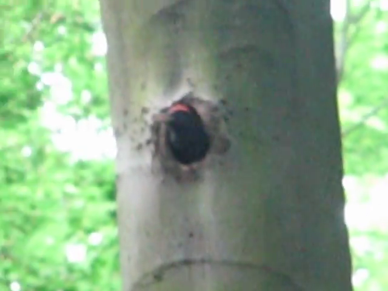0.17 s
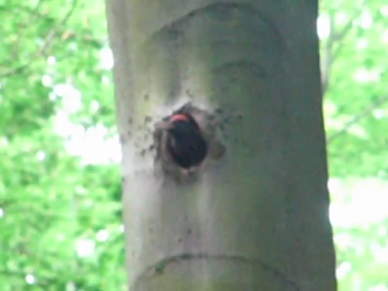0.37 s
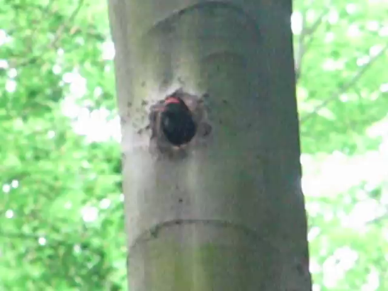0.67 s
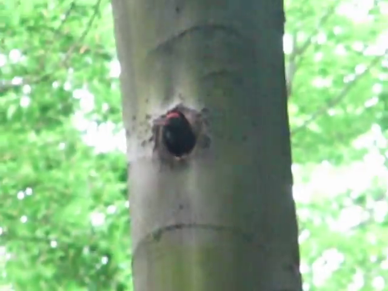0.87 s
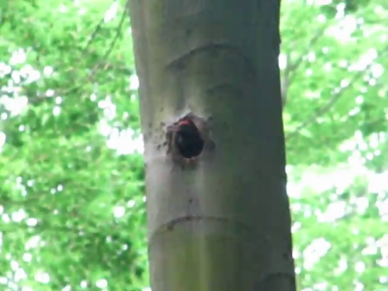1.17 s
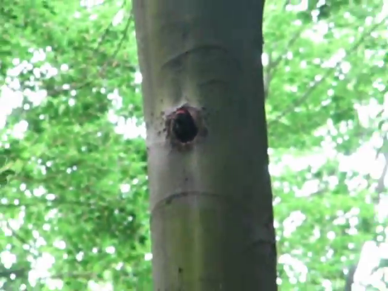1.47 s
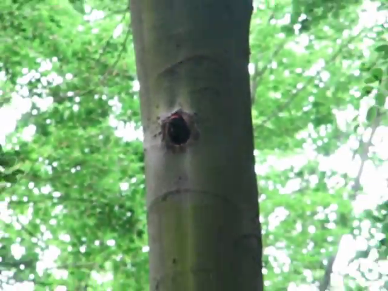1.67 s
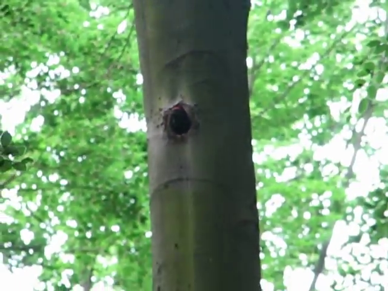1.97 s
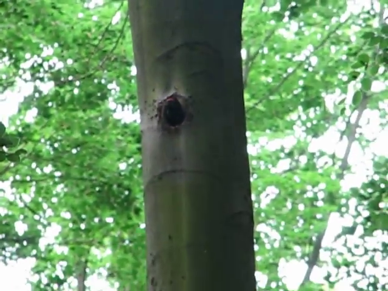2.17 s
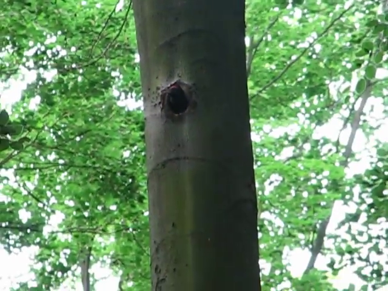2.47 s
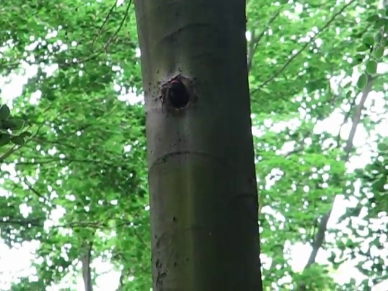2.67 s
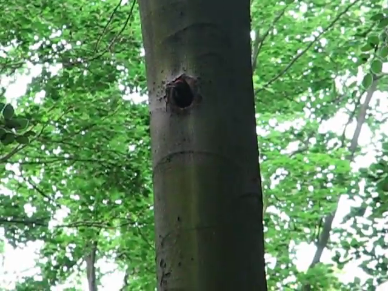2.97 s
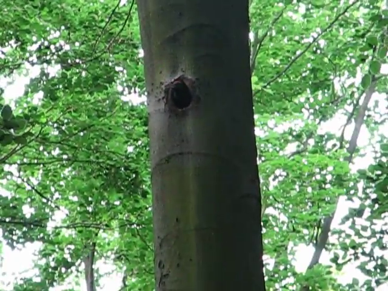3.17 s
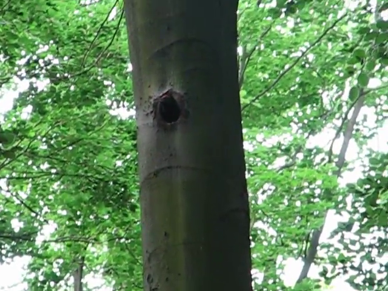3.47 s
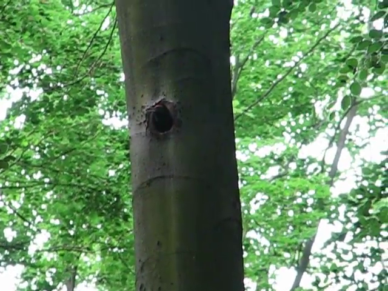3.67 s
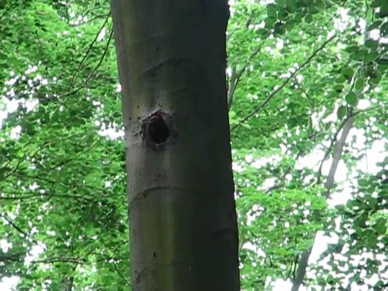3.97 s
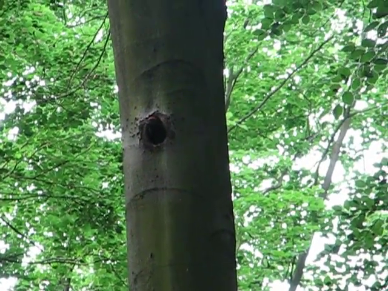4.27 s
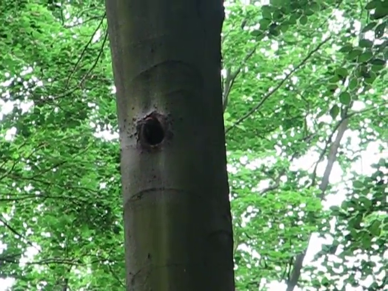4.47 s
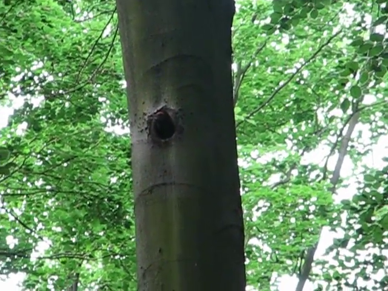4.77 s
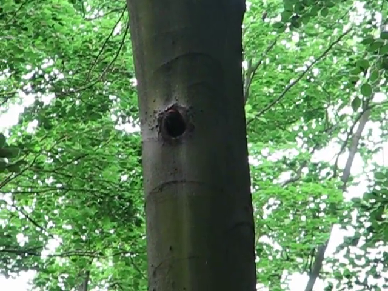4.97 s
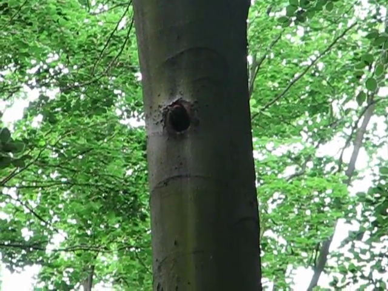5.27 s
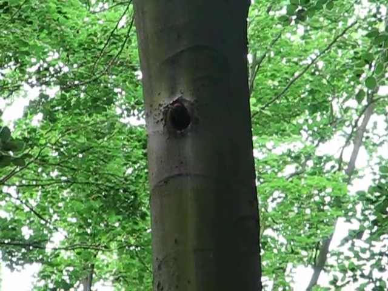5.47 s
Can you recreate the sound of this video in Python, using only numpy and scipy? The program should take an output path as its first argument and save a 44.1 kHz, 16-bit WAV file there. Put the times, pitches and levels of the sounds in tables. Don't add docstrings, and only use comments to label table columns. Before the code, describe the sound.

A woodland heard through a handheld stereo camera, about 5.6 seconds long. Soft broad leaf hiss, a thin steady motor whine near 8 kHz and a faint low rumble that swells now and then lie underneath. Nestlings rasp in dry, quickening buzzes, faint at 0.0, 0.3 and 0.55, stronger at 0.8, 1.1 and 1.35, then near 2.0, 2.2, 2.8, 3.0, 3.7, 4.0 and 4.7, with small beak clicks between. At 1.4 a parent's whistle whoops up and holds around 1.5 kHz until 2.1, dropping off at the end; a short squeal overlaps its start. Fingers knock dully on the camera throughout, sharpest at 1.6. Distant birds whistle thinly, and a sinking trill runs from 2.35 to 3.6 as the blurred chorus is fullest. A nearer high whistle sounds at 4.8, alongside two hoarse, sharp double barks at 4.8-4.9 and 5.1-5.2, echoing among trunks before fading into leaf hiss.

```python
import sys
import numpy as np
from scipy import signal
from scipy.fft import rfft, irfft
from scipy.io import wavfile
from scipy.ndimage import uniform_filter1d

SR = 44100
rng = np.random.default_rng(int(sys.argv[2]) if len(sys.argv) > 2 else 0)


def makeup_ratio(level_db):
    decades = np.asarray(level_db, float) / 20
    return 10 ** decades


def transcribe(signal):
    frames = np.atleast_2d(signal).T
    limited = np.clip(frames, -1, 1)
    pcm = np.round(limited * 32767).astype(np.int16)
    wavfile.write(sys.argv[1], SR, pcm)


N = 247401
TIME = np.arange(N) / SR

# time in seconds, effort in dB, overtones in dB per octave,
# share of the beak turned away from the camera (0-1).
LONG_EFFORT = [
    (1.394, 0, 0, .1),
    (1.45, 1.5, 0, .35),
    (1.54, -.5, 0, .1),
    (1.63, -3, 0, .05),
    (1.69, 4.5, -1.5, .05),
    (1.77, 2.5, -.5, .05),
    (1.86, -2.5, .3, .1),
    (2.05, 0.2, 2.8, .72),
    (2.092, -5, -6, .35),
]
LONG_TOP_S = 1.423


def noise(count):
    return rng.standard_normal(N if count == N else 2 ** 15)[:count]


def colour(table, hz):
    f, v = np.transpose(table)
    return np.interp(np.log(np.maximum(hz, 1)), np.log(f), v)


def shape(x, gain):
    count = x.shape[-1]
    hz = np.arange(count // 2 + 1) * SR / count
    return irfft(rfft(x) * gain(hz), count)


def unit(x):
    return x / np.sqrt(np.mean(x ** 2))


def walk(rate, count=N):
    k = max(int(SR / rate), 1)
    return unit(uniform_filter1d(uniform_filter1d(noise(count), k), k))


def bell(hz, width):
    return lambda f: 1 / (1 + 1j * (f - hz ** 2 / np.maximum(f, 1)) / width)


def rows(table, fade=0.0038):
    s, *columns = np.transpose(table)
    s = np.sort(s)
    part = slice(max(int(s[0] * SR), 0), min(int(s[-1] * SR), N))
    t = TIME[part]
    gate = np.clip(np.minimum(t - s[0], s[-1] - t) / fade, 0, 1)
    return part, [np.interp(t, s, c) for c in columns], gate


def pan(x, db):
    return x * makeup_ratio(np.array([[db / 2], [-db / 2]]))


def leaves_and_air():
    # frequency in Hz, level in dB per Hz.
    air_colour = [(15, -36), (25, -12), (76, .5), (273, -11), (321, -9), (706, -4), (1930, -9.5),
                  (3700, -2.5), (5720, -8), (7510, -8), (8150, -8), (8350, -18), (15200, -22), (16500, -45)]
    mid, side = rng.standard_normal((2, N))
    side = shape(side, lambda f: np.clip(.12 + f / 2000, 0, 1))

    def gain(f):
        spread = np.clip(0.19 + f / 2500, 0, 1)
        return makeup_ratio(colour(air_colour, f)) / np.sqrt(1 + spread ** 2)

    return makeup_ratio(-51.0) * unit(shape(np.array([mid + side, mid - side]), gain))


def low_rumble():
    # peak in seconds, level in dB, spread in seconds.
    swells = [
        (.25, -65, .35),
        (1.45, -59.5, .24),
        (2.42, -62, .22),
        (3.35, -66, .2),
        (3.72, -57.5, .24),
        (4.45, -70, .12),
    ]
    level = makeup_ratio(-67) + sum(makeup_ratio(db) * np.exp(-((TIME - s) / spread) ** 2) for s, db, spread in swells)
    low = rng.standard_normal(N) + 0.36 * rng.standard_normal((2, N))
    low = unit(shape(low, lambda f: bell(340, 260)(f) ** 2))
    return pan(low, 1.9) * level * makeup_ratio(2.35 * walk(13.7))


def bird_blur():
    # time in seconds, level in dB.
    chorus_curve = [
        (0, -66),
        (.5, -62),
        (1.2, -62),
        (2.2, -54),
        (2.9, -50),
        (3.6, -50),
        (4.1, -53),
        (4.6, -58),
        (5.61, -55),
    ]
    bands = [(2994, 750, 1.5), (3700, 570, -1.5), (4400, 790, 2)]  # (Hz, width Hz, dB)
    chorus = 0
    for hz, width, db in bands:
        band = unit(shape(rng.standard_normal((2, N)), lambda f: bell(hz, width)(f) ** 2))
        chorus = chorus + makeup_ratio(db - 4.0 + 2.55 * walk(12.6)) * band
    return chorus * makeup_ratio(np.interp(TIME, *np.transpose(chorus_curve)))


def motor_whine():
    hiss = rng.standard_normal(N) + 0.96 * rng.standard_normal((2, N))
    return makeup_ratio(-63) * unit(shape(hiss, bell(8010, 60)))


def handling():
    # start in seconds, peak in dB, ring in Hz, snap in dB, left minus right in dB.
    knocks = [(0.971, -40.5, 480, -18, -5), (1.125, -43.5, 720, -13, -6), (1.601, -27.5, 800, 8, 2),
              (1.608, -32, 577, -17, -9), (1.849, -49, 791, -8, 1.5), (2.229, -41, 547, -11, -4),
              (2.334, -40.5, 557, -18, -7), (2.719, -42, 1040, -14, -1), (2.749, -43, 1100, -8, -1),
              (3.553, -38, 293, -19, 2.0), (3.63, -44, 385, -10, 4), (3.798, -42, 318, -15, 6),
              (4.299, -49, 1030, -13, -3), (4.428, -37, 330, -12, 3), (4.787, -47, 721, -7, 0.5),
              (5.014, -40, 570, -11, -7), (5.053, -45, 720, -8, -3)]
    out, t = np.zeros((2, N)), np.arange(1300) / SR
    for s, db, hz, snap_db, side_db in knocks:
        ring = np.sin(2 * np.pi * hz * t) * np.exp(-t / .004) * np.minimum(t * hz * 1.2, 1)
        ring += .7 * np.sin(2 * np.pi * 1.57 * hz * t) * np.exp(-t / 0.0024)
        ring += .6 * np.sin(2 * np.pi * 1350 * t) * np.exp(-t / .0007)
        snap = makeup_ratio(snap_db) * np.sin(2 * np.pi * 2400 * t) * np.exp(-t / 0.00085)
        start = int(s * SR)
        out[:, start:start + len(t)] += pan(makeup_ratio(db) * (ring + snap), side_db)
    tick_s, left_db, right_db, lag = .03627, -6.5, -1.5, .7
    k = np.arange(N) - (tick_s - 1e-4) * SR
    tick = makeup_ratio(np.array([[left_db], [right_db]])) * np.sinc(0.76 * (k - np.array([[0], [lag]])))
    return out - tick


def trill_notes():
    notes = []
    for k in range(17):
        stressed = k % 2
        hz = 3480 - k * (26 + 12 * (1 - stressed))
        db = -48.5 + .45 * k * (stressed - .5)
        notes.append((2.347 + k * .0746, .027, hz * 1.1, hz * .9, 15, db, -3.0))
    return notes


def songbirds():
    # start in seconds, length in seconds, pitch in Hz, level in dB.
    high_bird = [
        (.38, .12, 4480, -53),
        (.5, .25, 4400, -57),
        (1.66, .22, 4380, -55),
        (2.57, .25, 4365, -53.5),
        (3.14, .093, 4370, -61),
        (3.42, .21, 4340, -53.5),
        (4.805, .18, 4420, -44.5),
    ]
    low_bird = [
        (.54, .12, 3760, -50),
        (.66, .22, 3760, -54),
        (.85, .14, 3800, -61),
        (1.25, .04, 3590, -55),
        (4.1, .3, 3680, -63),
        (4.75, .04, 3560, -54),
    ]
    stray_bird = [
        (0, .39, 5380, -60),
        (2.7, .07, 1100, -55),
    ]
    # blur in Hz (the last a share of pitch), left minus right in dB.
    bird_voices = [
        (45, .5),
        (130, -3.5),
        (.07, -.5),
    ]
    # start in seconds, length in seconds, start in Hz, end in Hz, level in dB.
    slides = [
        (3.24, .05, 5600, 6600, -59),
        (4.45, .1, 8000, 8500, -64),
        (4.55, .04, 6500, 3600, -60),
        (4.59, .04, 3600, 4400, -60),
    ]
    notes = []
    for bird, (blur, side_db) in zip((high_bird, low_bird, stray_bird), bird_voices):
        for s, length, hz, db in bird:
            blur_hz = blur if blur > 1 else blur * hz
            notes.append((s, length, hz, hz * (1 - .008), blur_hz, db, side_db))
    notes += [(s, length, hz0, hz1, 30, db, -.5) for s, length, hz0, hz1, db in slides]
    out = np.zeros((2, N))
    for s, length, hz0, hz1, blur_hz, db, side_db in notes + trill_notes():
        part, (hz,), gate = rows([(s, hz0), (s + length, hz1)], fade=.012)
        tone = np.sin(2 * np.pi * np.cumsum(hz + blur_hz * walk(450, len(hz))) / SR)
        out[:, part] += pan(gate * makeup_ratio(db + 2.1 * walk(40, len(hz))) * tone, side_db)
    return out


def trunks(x):
    # frequency in Hz, time to die by 60 dB in seconds.
    echo_t60 = [(500, 1.6), (1500, 1.9), (3200, 1.1), (4500, 1.15), (6500, .9), (10000, .3), (15000, 0.18)]
    gap_s, rise_s, early_s, early_db = .008, .02, .06, 6.0
    t = np.arange(int(1.6 * SR)) / SR
    tail = 0
    for hz in 400 * 2 ** np.arange(0, 5.4, .5):
        band = shape(rng.standard_normal((3, len(t))),
                     lambda f: np.exp(-(np.log2(f / hz + 1e-9) * 2.4) ** 2))
        tail = tail + (band[:2] + .6 * band[2]) * makeup_ratio(-60 * t / colour(echo_t60, hz))
    tail = tail * (1 + makeup_ratio(early_db) * np.exp(-t / early_s))
    tail = tail * (1 - np.exp(-np.maximum(t - gap_s, 0) / rise_s)) / np.sqrt(SR / 5)
    return signal.fftconvolve(np.atleast_2d(x), tail, axes=1)[:, :N]


def near_trunks(near):
    # delay in seconds, level in dB, left minus right in dB.
    slaps = [
        (.04, -12, 2),
        (.022, -17, -3),
        (.071, -19, 0),
    ]
    soft = uniform_filter1d(near, size=3)
    return sum(pan(makeup_ratio(db) * np.roll(soft, int(lag * SR)), side_db) for lag, db, side_db in slaps)


def microphone_ports(near):
    # frequency in Hz, left minus right in dB.
    port_tilt = [(1000, -1), (3300, -6.5), (4500, 2.5), (6500, -2), (11000, -2.5)]
    return np.array([shape(near, lambda f: makeup_ratio(side * colour(port_tilt, f) / 2) * np.exp(.22j * side))
                     for side in (1, -1)])


def rasps():
    # peak in seconds, peak in dB, swell in seconds per 20 dB, pulses per second at the peak,
    # break in seconds per 20 dB.
    begging = [(.03, -50, .08, 500, .03), (.265, -53, .1, 480, .04), (.55, -47, .1, 520, .04),
               (.798, -40, .08, 600, .015), (1.102, -37, .09, 700, .02), (1.345, -32, .06, 850, .04),
               (1.99, -44, .08, 600, .04), (2.218, -41, .06, 560, .06), (2.783, -43, .08, 590, .03),
               (3.024, -40, .06, 585, .02), (3.722, -39, .1, 635, .012), (3.992, -38, .09, 600, .02),
               (4.375, -54, .08, 550, .04), (4.663, -40, .09, 600, .02)]
    # resonance in Hz, width in Hz, level in dB.
    rasp_throat = [(2700, 800, -11), (3900, 1500, -7), (6550, 600, 5), (7500, 904, -3), (5800, 6000, -10)]
    # start in seconds, level in dB.
    beak_clicks = [
        (.495, -33),
        (.725, -38),
        (1.008, -33),
        (3.633, -31),
        (4.575, -34),
        (4.788, -28),
        (5.053, -30),
    ]
    pulses = np.zeros(N)
    for s, peak_db, swell, top_rate, stop in begging:
        part = slice(max(int((s - .2) * SR), 0), int((s + .1) * SR))
        t = TIME[part] - s
        effort_db = np.where(t < 0, 20 * t / swell, -20 * t / stop)
        rate = top_rate * makeup_ratio(.16 * effort_db) * (1 + .05 * walk(500, len(t)))
        beats = np.diff(np.floor(np.cumsum(rate) / SR), prepend=0)
        breathy = .03 * noise(len(t))
        uneven = beats * makeup_ratio(2.5 * noise(len(t)))
        pulses[part] += makeup_ratio(peak_db + effort_db) * (uneven + breathy) * np.sqrt(SR / top_rate)
    for s, db in beak_clicks:
        pulses[int(s * SR) + np.array([0, 60, 150])] += makeup_ratio(db) * np.array([1, .7, .5])

    def response(f):
        ring = sum(makeup_ratio(db) * bell(hz, width)(f) for hz, width, db in rasp_throat)
        dulled = ring / (1 + 1j * f / 11000) ** 2 / (1 + 1j * f / 8000)
        return dulled / (1 - 1j * 1500 / (f + 1))

    return makeup_ratio(7.5) * shape(pulses, response)


def cry(table, throat, hoarse_db=-10.5):
    part, (hz, db, half_db, jitter, third_db), gate = rows(table)
    turn = 2 * np.pi * np.cumsum(hz * (1 + 1.6 * jitter * walk(1500, len(hz)))) / SR
    voice = 0
    for k in range(1, 17):
        line_db = colour(throat, k * hz / 2) + half_db * (k % 2) + third_db * (k == 6)
        voice = voice + makeup_ratio(line_db) * np.sin(k * turn / 2 + k * k)
    puffs = (1 + np.sin(turn)) * noise(len(hz))
    hoarse = makeup_ratio(hoarse_db) * unit(shape(puffs, lambda f: makeup_ratio(.72 * colour(throat, f))))
    out = np.zeros(N)
    out[part] = gate * makeup_ratio(db + 1.5 * walk(250, len(hz))) * (unit(voice) + hoarse)
    return out


def second_bird():
    # time in seconds, pitch in Hz, level in dB.
    squeal_curve = [
        (1.419, 1930, -37),
        (1.443, 1900, -29),
        (1.48, 1870, -30.5),
        (1.525, 1780, -42),
    ]
    # frequency in Hz, level in dB.
    squeal_throat = [(1500, -11), (3700, -2), (5700, -4), (7600, 3), (9500, -11), (11400, -11),
                     (15000, -32)]
    half_db, jitter = -25, .023
    return cry([(*row, half_db, jitter, 0) for row in squeal_curve], squeal_throat)


def bark(s, hoarse, clean, snap_hz, db, half_db, air_db):
    # frequency in Hz, level in dB.
    bark_throat = [(500, -50), (1000, -30), (1600, -18), (2300, -15), (3200, 0), (4400, -7), (6400, -3),
                   (8200, -13), (9500, -25), (15000, -42)]
    rough, calm = .032, .008
    low_hz, top_hz, sag_hz, end_hz = 1050, 1640, 1460, 1250
    edge_db, hoarse_db, sag_db = -19, -3.5, -4
    snap = s + hoarse
    held_hz = snap_hz + .3 * (sag_hz - snap_hz)
    steps = [(s, low_hz, edge_db, rough),
             (s + .4 * hoarse, top_hz, hoarse_db, rough),
             (snap - .003, top_hz, hoarse_db, rough),
             (snap, snap_hz, 0, calm),
             (snap + .55 * clean, held_hz, 0, calm),
             (snap + clean, sag_hz, sag_db, calm),
             (snap + clean + .008, end_hz, edge_db, rough)]
    third_db = -4 + 11 * np.exp(-((3 * snap_hz - 4400) / 300) ** 2)
    curve = [(t, hz, db + rel_db, half_db, jitter, third_db) for t, hz, rel_db, jitter in steps]
    return cry(curve, bark_throat, air_db)


def double_barks():
    # start in seconds, hoarse part in seconds, clean part in seconds, pitch at the snap in Hz,
    # level in dB.
    bark_events = [
        (4.824, .03, .014, 1470, -24.5),
        (4.892, .021, .013, 1670, -21.5),
        (5.082, .031, .017, 1660, -22.3),
        (5.163, .021, .008, 1640, -22),
    ]
    half_db, air_db = (-13, -20), (-6.5, -10.5)
    return sum(bark(*row, half_db[k % 2], air_db[k % 2]) for k, row in enumerate(bark_events))


def long_pitch(t):
    start_hz, top_hz, hold_hz = 1465, 1930, 1561
    start, end = LONG_EFFORT[0][0], LONG_EFFORT[-1][0]
    rise = np.interp(t, [start, LONG_TOP_S], [start_hz, top_hz])
    settle = hold_hz + (top_hz - hold_hz) * np.exp(-np.maximum(t - LONG_TOP_S, 0) / .012)
    return np.where(t < LONG_TOP_S, rise, settle) - 660 * np.exp((t - end) / .023)


def long_call():
    # harmonic number, level in dB, fades per second,
    # one fade in seconds, reflection share (0-1).
    overtones = [(1, -40.3, 9.5, 1.655, .25), (2, -39.3, 13.0, 1.724, .5), (3, -43, 19, 1.748, .5),
                 (4, -49, 17, 1.7, .4), (5, -46, 15, 1.75, .5), (6, -52, 11, 1.8, .4),
                 (7, -65, 14, 1.7, .4)]
    part, (effort_db, tilt_db, _), gate = rows(LONG_EFFORT)
    t = TIME[part]
    since = np.maximum(t - LONG_TOP_S, 0)
    effort_db = effort_db + 12 * np.exp(-since / .014) * (t >= LONG_TOP_S)
    shut = np.exp(-(since / .055) ** 2)
    tilt_db = tilt_db - 13 * shut
    turn = 2 * np.pi * np.cumsum(long_pitch(t) * (1 + .001 * walk(60, len(t)))) / SR
    out = np.zeros((2, N))
    for k, db, rate, fade_s, share in overtones:
        k, share = round(k), share * (1 - shut)
        paths = np.abs(1 - share * np.exp(2j * np.pi * rate * (t - fade_s))) / np.sqrt(1 + share ** 2)
        side_db = -2.5 / 2 + 2.2 * walk(9.4, len(t))
        level_db = db + effort_db + tilt_db * np.log2(k) + 1.5 * walk(45, len(t))
        level = np.sqrt(2) * gate * paths * makeup_ratio(level_db + np.array([side_db, -side_db]))
        out[:, part] += level * np.sin(k * turn + np.array([[0], [-.15 * k]]))
    return out


def scene():
    background = leaves_and_air() + low_rumble() + bird_blur() + motor_whine()
    far, call = songbirds(), long_call()
    rasp, squeal, barks = rasps(), second_bird(), double_barks()
    near = barks + makeup_ratio(-3.5) * squeal + rasp
    away = np.interp(TIME, *np.transpose(LONG_EFFORT)[[0, -1]])
    straight_call = call * makeup_ratio(-11 * away)
    echo_db = -6 + 11 * away
    wet_call = shape(makeup_ratio(echo_db + 1.2) * call.mean(0), lambda f: 1 / (1 - 1j * 1900 / (f + 1)))
    echo = makeup_ratio(-4.5) * barks + makeup_ratio(-1.2) * squeal + makeup_ratio(.3) * rasp + wet_call + makeup_ratio(1.0) * far.mean(0)
    direct = microphone_ports(near) + near_trunks(near) + straight_call + far
    return direct + trunks(echo) + handling() + background


def top_cut(x):
    return signal.sosfilt(signal.butter(12, 17010, fs=SR, output="sos"), x)


def record(dry):
    cut = signal.ellip(8, .2, 60, 15750, fs=SR, output="sos")
    return top_cut(signal.sosfilt(cut, dry))


dry = scene()
out = record(dry)
transcribe(out)
```